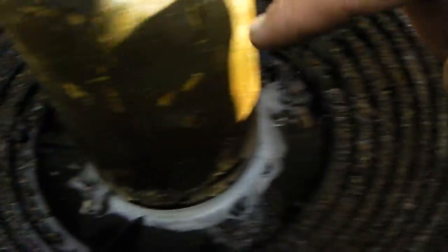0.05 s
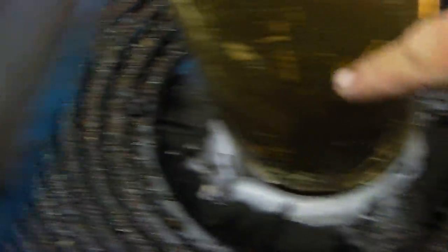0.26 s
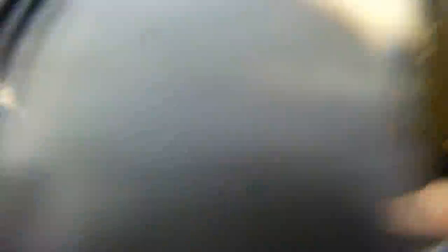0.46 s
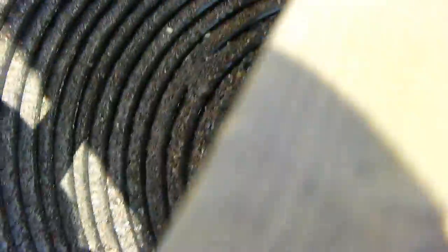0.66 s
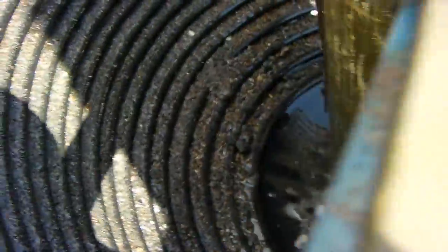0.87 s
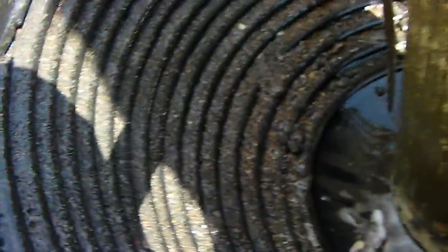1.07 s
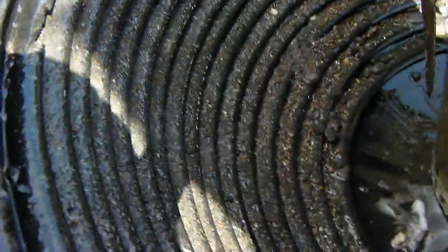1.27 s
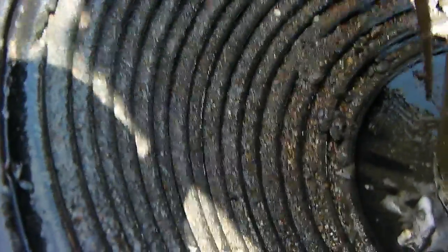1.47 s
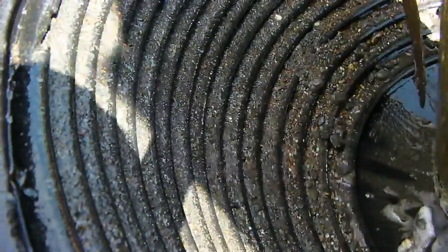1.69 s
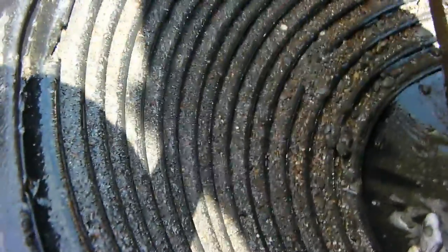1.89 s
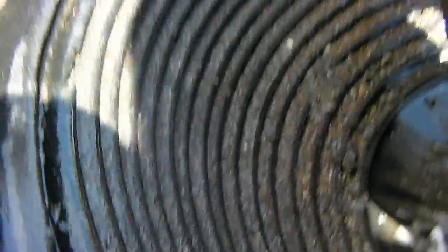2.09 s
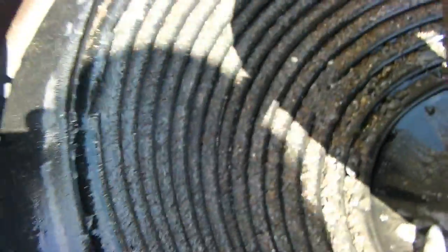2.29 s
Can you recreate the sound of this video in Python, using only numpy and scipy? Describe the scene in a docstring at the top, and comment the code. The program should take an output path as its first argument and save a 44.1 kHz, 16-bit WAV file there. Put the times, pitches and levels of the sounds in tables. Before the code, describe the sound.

A blade scrapes wet grit around a ribbed bowl in six short strokes, with clicks and hollow knocks. Before that come a rustle, a low rubbing groan, a squeak and one heavy bump right beside the microphone, outdoors.

```python
"""Outdoors, close to the microphone, a blade scrapes wet grit round a ribbed bowl in six strokes.
The grains click as the blade sticks and slips; they and the knocks ring the same hollow bowl.
Before the strokes, things are shifted about: a rustle, a low rubbing groan, a squeak, and right
beside the microphone one heavy bump that overloads it and bounces. Faint open air lies behind."""
import sys
import numpy as np
from scipy import signal
from scipy.fft import rfft, irfft
from scipy.io import wavfile
from scipy.ndimage import uniform_filter1d

SR = 44100
rng = np.random.default_rng(int(sys.argv[2]) if len(sys.argv) > 2 else 0)


def dump_mix(stems):
    """Bounce the given channels to the path in sys.argv[1] as a 16-bit WAV at rate SR."""
    frames = np.atleast_2d(stems).T  # one column per channel
    limited = np.clip(frames, -1, 1)  # hard clip at full scale
    pcm = np.round(limited * 32767).astype(np.int16)
    wavfile.write(sys.argv[1], SR, pcm)


N = 108045


def amp(db):
    """Decibels to gain."""
    return 10 ** (np.asarray(db) / 20)


def unit(x):
    """Scale to rms 1."""
    return x / np.sqrt(np.mean(x ** 2))


def decay(t, t60):
    """A fade that falls 60 dB in t60 seconds."""
    return np.exp(-np.log(1000) * t / t60)


def envelope(rows, column=1):
    """Gain along one dB column of a curve, fading out quickly beyond its ends."""
    rows, t = np.array(rows), np.arange(N) / SR
    inside = uniform_filter1d(1. * ((t >= rows[0, 0]) & (t <= rows[-1, 0])), size=300)
    return amp(np.interp(t, rows[:, 0], rows[:, column])) * inside


def colour(x, points):
    """Minimum-phase filter through (Hz, dB) points."""
    size = 4096
    hz, db = np.array(points).T
    curve = np.interp(np.log(np.fft.rfftfreq(size, 1 / SR) + 1), np.log(hz), db)
    cepstrum = irfft(np.log(amp(curve)))[:size // 2]
    cepstrum[1:] *= 2
    impulse = irfft(np.exp(rfft(cepstrum, size)))
    return signal.fftconvolve(x, impulse)[:len(x)]


def band(x, hz, kind, order=3):
    """Butterworth filter."""
    sos = signal.butter(order, np.minimum(hz, SR / 2 - 1), kind, fs=SR, output="sos")
    return signal.sosfilt(sos, x)


def wander(per_s):
    """A random curve of rms 1 that turns per_s times a second."""
    return unit(np.interp(np.arange(N) / SR * per_s, np.arange(4096), rng.standard_normal(4096)))


def struck(blows, modes, column, rise_cycles):
    """Modes that swell and die away after each blow, its strength read from one dB column."""
    force, t = np.zeros(N), np.arange(SR // 3) / SR
    for blow in blows:
        force[int(blow[0] * SR)] += amp(blow[column])
    ring = 0
    for hz, db, t60 in modes:
        rise = 1 - np.exp(-t * hz / rise_cycles)
        ring += amp(db) * np.sin(2 * np.pi * hz * t) * decay(t, t60) * rise
    return signal.fftconvolve(force, ring)[:N]


def pan(x, db):
    """Place a sound by its left-minus-right level."""
    return x * amp(np.array([[db], [-db]]) / 2)


# Stereo width at the microphone. Each row: frequency in Hz, side gain in dB.
STEREO_WIDTH = [(50, -5), (130, -14.5), (400, -13), (1500, -17), (2800, -18), (5000, -7.5), (9000, -5.5),
                (15000, -5)]

def stereo(mid, side):
    """Left and right, narrowest in the midrange."""
    return mid + colour(side, STEREO_WIDTH) * np.array([[1], [-1]])


def spread(source):
    """Draw a random source twice, as mid and as side."""
    return stereo(source(), source())


# The air behind the bowl. Each row: frequency in Hz, gain in dB.
AIR_COLOUR = [(35, -31), (60, -40), (117, -3), (224, -13), (418, 7.5), (605, -8), (1330, -5), (1520, -7),
              (9230, -13.5), (15000, -83)]

def open_air():
    """Faint, steady outdoor noise."""
    return amp(-44) * spread(lambda: unit(colour(rng.standard_normal(N), AIR_COLOUR)))


# Handling, close by. Each row: time in seconds, level in dB.
RUMBLE_LEVEL = [(0, -42.5), (.3, -39), (.5, -44), (.65, -54), (.85, -46.5), (.95, -42.5), (1.15, -44),
                (1.4, -48), (1.7, -54.5), (2.2, -45.5), (2.45, -53.5)]
# Its tone. Each row: frequency in Hz, gain in dB.
RUMBLE_COLOUR = [(20, -30), (45, -14), (80, -2), (150, -1.5), (240, -14), (500, -7), (2000, -64)]

def handling_rumble():
    """Low noise that swells and sinks as things are handled."""
    noise = spread(lambda: unit(colour(rng.standard_normal(N), RUMBLE_COLOUR)))
    return noise * envelope(RUMBLE_LEVEL)


def grit(per_s, chatter_db, spread_db=2):
    """Dense grain clicks of uneven size that bunch as the contact sticks and slips."""
    clicks = (rng.random(N) < per_s / SR) * rng.choice([-1, 1], N)
    size_db = spread_db * np.minimum(rng.exponential(size=N), 5)
    return unit(clicks * amp(size_db + chatter_db * wander(per_s=130)))


def wet_ticks(per_s=260, low_hz=2640, high_hz=12130, spread_db=8.5):
    """Small pitched ticks of wet grit, a few much louder than the rest."""
    out, t = np.zeros(N + SR), np.arange(SR // 20) / SR
    fade, candidates = decay(t, t60=0.035), 1000
    for when, pitch, size, chance in rng.random((candidates, 4)):
        if chance * candidates < per_s * N / SR:
            hz, start = low_hz + pitch * (high_hz - low_hz), int(when * N)
            gain = amp(-spread_db * np.log(max(size, 0.1)))
            out[start:start + len(t)] += gain * fade * np.sin(2 * np.pi * hz * t)
    return unit(out[:N])


# Grit shifting near the microphone. Each row: time in seconds, level in dB.
RUSTLE_LEVEL = [(0, -34.5), (.04, -31), (.1, -32.5), (.2, -31), (.32, -30.5), (.42, -29.5), (.55, -34.5),
                (.7, -35.5), (.82, -37.5), (1.2, -39.5), (1.8, -43), (2.45, -47)]
# Its tone. Each row: frequency in Hz, gain in dB.
RUSTLE_COLOUR = [(180, -101), (300, -21.5), (404, 2), (543, -21), (744, -8.5), (1240, -11.5), (1560, -10.5),
                 (2210, -9.5), (2980, -8), (3450, -11), (7620, -8.5), (15500, -14)]

def rustle():
    """Handled grit: a wash of grain clicks dotted with wet ticks."""
    def grains_and_ticks():
        grains = unit(colour(grit(per_s=9000, chatter_db=2.15), RUSTLE_COLOUR))
        ticks = unit(colour(wet_ticks(), RUSTLE_COLOUR))
        return grains + amp(-11.5) * ticks
    return spread(grains_and_ticks) * envelope(RUSTLE_LEVEL)


# Knocks on the bowl, close up. Each row: start in seconds, then body, rasp, treble and rim levels in dB.
KNOCKS = [(0.0716, -73, -32, -37, -63), (0.1926, -30, -24, -20.5, -60), (0.203, -30, -21, -41, -40),
          (0.2629, -36, -34, -19.5, -60), (0.2908, -35, -28, -49, -52), (0.4312, -11, -15.5, -19.5, -19),
          (0.493, -23, -34, -26, -48), (0.831, -36, -18.5, -42, -50), (0.9342, -16.5, -23, -10.5, -30),
          (0.944, -6, -31, -43, -43), (1.0587, -50, -39, -16.5, -47), (1.102, -35, -22, -34, -15.5),
          (1.12, -9, -43, -32, -40), (1.2335, -14, -16, -15, -17.5), (1.330, -15.5, -32.5, -26.5, -22),
          (1.336, -21, -36, -34, -34), (1.441, -43, -35, -17.5, -50), (1.7993, -38, -41, -28.5, -62),
          (1.815, -40, -40, -30, -60), (2.0549, -46, -34, -17, -55), (2.1704, -24, -19.5, -19.5, -51),
          (2.187, -46, -17.5, -18.5, -50), (2.305, -46, -37, -32.5, -70), (2.402, -56, -49.5, -37, -75)]

def knock_force(column, crunch, pulse=0.32, crunch_s=0.0014):
    """Force of the knocks in one register: a sharp pulse and a short crunch of crushed grit."""
    force, t = np.zeros(N + SR), np.arange(SR // 20) / SR
    fade = t * np.exp(-t / crunch_s)
    scale = np.sqrt(0.0086 * SR)  # a knock's level counts over 8.6 ms
    for knock in KNOCKS:
        crushed = rng.standard_normal(len(t)) * fade / np.linalg.norm(fade)
        blow = pulse * (t == 0) + crunch * crushed
        start = int(knock[0] * SR)
        force[start:start + len(t)] += blow * amp(knock[column]) * scale
    return force[:N]


# Notes of the rim. Each row: frequency in Hz, gain in dB, t60 in seconds.
RIM_MODES = [(875, 3.5, 0.12), (1036, -3, 0.16), (843, -2, 0.086)]
# Notes of the air in the bowl. Each row: frequency in Hz, gain in dB, t60 in seconds.
CAVITY_MODES = [(130, -14, 0.18), (195, -11, 0.075), (420.4, -6.5, 0.11), (449.2, 0.5, 0.16)]

def knock_notes():
    """Each knock sets the rim and the air in the bowl ringing."""
    rim = struck(KNOCKS, RIM_MODES, column=4, rise_cycles=5.7)
    cavity = struck(KNOCKS, CAVITY_MODES, column=1, rise_cycles=5.7)
    return rim + cavity


# A falling groan, dead centre. Each row: time in seconds, pitch in Hz, level in dB.
GROAN = [(.09, 182.4, -61), (.135, 170, -31.5), (.165, 156.4, -28), (.22, 144.4, -36.5), (.29, 127, -42),
         (.34, 115.7, -58)]
# A brief squeak over it. Each row: time in seconds, pitch in Hz, level in dB.
SQUEAK = [(.195, 1030, -36), (.202, 1056, -20.5), (.209, 1060, -19), (.214, 1076, -28), (.23, 1060, -29)]

def rubbing(curve, roughness):
    """A gliding stick-slip tone with an unsteady pitch."""
    times, hz, _ = np.array(curve).T
    pitch = np.interp(np.arange(N) / SR, times, hz) * (1 + roughness * wander(per_s=204))
    return np.sqrt(2) * np.sin(2 * np.pi * np.cumsum(pitch) / SR) * envelope(curve, column=2)


# The blade close up, one curve a resonance; the curve at 0.196 s rings with the squeak, and the two curves at
# 2.171 s are the ringing clack of the knock there. Each row: time in seconds, frequency in Hz, level in dB.
BLADE_RESONANCES = [
    [(.196, 2150, -37), (.208, 2190, -26.5), (.255, 2090, -45)],
    [(1.88, 5300, -41), (1.95, 5500, -26), (2.03, 5500, -37)],
    [(2.052, 2587, -19.5), (2.075, 2560, -28), (2.095, 2616, -35)],
    [(2.055, 3250, -21.5), (2.1, 3386, -34), (2.125, 3625, -27), (2.15, 3900, -36)],
    [(2.07, 4240, -39), (2.11, 4150, -30), (2.19, 4200, -48)],
    [(2.07, 10000, -29), (2.125, 11900, -26), (2.16, 13000, -40)],
    [(2.171, 1280, -16), (2.19, 1300, -33), (2.26, 1320, -40)],
    [(2.171, 1800, -16), (2.19, 1780, -28), (2.25, 1750, -42)],
]

def singing_blade(relative_width=0.081):
    """The scraping blade, the squeak and the clack of one knock resonate in narrow, gliding bands of friction
    noise."""
    out = 0
    for curve in BLADE_RESONANCES:
        times, hz, _ = np.array(curve).T
        phase = 2 * np.pi * np.cumsum(np.interp(np.arange(N) / SR, times, hz)) / SR
        width_hz = relative_width * hz.mean()
        noise = np.sin(phase) * wander(width_hz) + np.cos(phase) * wander(width_hz)
        out += noise * envelope(curve, column=2)
    return out


# A bump beside the microphone, main blow first, then a light touch just before it and the bounces after. Each
# row: start in seconds, level in dB.
BUMPS = [(0.4316, -4), (0.415, -39.5), (0.473, -23), (0.4785, -27.5), (0.4909, -24), (0.504, -24.5),
         (0.532, -36), (0.632, -36.5)]
# Notes of the bumped thing. Each row: frequency in Hz, gain in dB, t60 in seconds.
BUMP_MODES = [(56.7, -4.5, .12), (78.6, -4.5, 0.11), (171, -9.5, 0.09), (406.4, -2.5, 0.14),
              (433.5, 13.5, 0.06), (654, -37, 0.034), (798, 13, 0.021), (922, -1, 0.036),
              (1216, -1.5, 0.045)]

def heavy_bump(split_hz=200, crack_s=0.0011):
    """One crack and dull bounces; the deep thud leans left, the higher ring right."""
    since = np.arange(N) / SR - BUMPS[0][0]
    burst = (since >= 0) * np.exp(-np.abs(since) / crack_s)
    crack = spread(lambda: burst * unit(band(rng.standard_normal(N), [900, 7500], "bandpass", order=1)))
    thud = struck(BUMPS, [m for m in BUMP_MODES if m[0] < split_hz], column=1, rise_cycles=0.091)
    ring = struck(BUMPS, [m for m in BUMP_MODES if m[0] >= split_hz], column=1, rise_cycles=0.95)
    return pan(band(thud, 30, "highpass"), db=2.5) + pan(ring, db=-8) + amp(-0.5) * crack


# Six close strokes, one curve each. Each row: time in seconds, then body, rasp and treble levels in dB.
STROKES = [
    [(0.8, -49, -29.5, -37), (0.818, -35, -37, -38), (0.836, -25.5, -15.5, -20), (0.874, -29.5, -16, -17.5),
     (0.912, -29, -27, -25), (0.94, -31, -16, -12), (0.96, -35, -24.5, -48), (0.985, -31, -40, -50)],
    [(1.0, -35, -45, -51), (1.02, -36, -32, -29), (1.046, -39, -27, -28), (1.062, -34, -16.5, -19),
     (1.084, -38, -23.5, -16.5), (1.104, -18.5, -17, -20), (1.142, -26.5, -23, -33), (1.2, -34, -49, -65)],
    [(1.355, -29, -28, -30), (1.369, -26.5, -19, -18.5), (1.393, -28.5, -26, -31), (1.431, -25, -26, -21),
     (1.445, -36, -22, -20.5), (1.485, -30, -57, -57), (1.513, -44, -41, -48), (1.52, -35, -45, -45)],
    [(1.52, -42, -38, -47), (1.534, -39, -38, -40), (1.554, -49, -30.5, -30.5), (1.582, -36.5, -20, -24.5),
     (1.634, -39, -21, -21.5), (1.68, -40, -25.5, -26.5), (1.708, -33, -26.5, -33), (1.735, -37, -52, -56)],
    [(1.83, -51, -43, -50), (1.864, -38.5, -37, -37), (1.888, -31, -35.5, -25.5), (1.912, -37, -32, -29.5),
     (1.946, -38, -22.5, -18.5), (1.996, -35, -30, -31), (2.022, -55, -36, -35), (2.04, -27, -36, -36)],
    [(2.04, -43, -35, -40), (2.058, -27, -21, -16), (2.104, -30.5, -33, -22.5), (2.126, -30, -30, -23.5),
     (2.162, -30, -26, -24.5), (2.174, -37, -19, -47), (2.186, -23.5, -36, -38), (2.22, -42, -38, -65)],
]

def scrape_force(grains, column):
    """Force of the blade dragging grit over the ribs, in one register."""
    return grains * sum(envelope(stroke, column) for stroke in STROKES)


# Echoes inside the bowl. Each row: octave centre in Hz, gain in dB, t60 in seconds.
WALL_ECHOES = [(600, -4, 0.36), (1296, 5, 0.2), (2320, -1, 0.19), (4200, 3.5, 0.097), (8260, -7, 0.11),
               (15100, 5.5, 0.036)]

def reflections(t):
    """Dense echoes between the walls of the bowl, shorter in the treble."""
    out = 0
    for hz, db, t60 in WALL_ECHOES:
        fade = decay(t, t60)
        echoes = rng.standard_normal(len(t)) * fade / np.linalg.norm(fade)
        out += amp(db) * band(echoes, [hz / np.sqrt(2), hz * np.sqrt(2)], "bandpass", order=2)
    return out


# Notes of the bowl. Each row: frequency in Hz, gain over the plain contact in dB, t60 in seconds.
BOWL_MODES = [(134, 11, 0.35), (406, 25, 0.2), (433.6, 22.5, 0.13), (550, 14.5, 0.19), (659.5, 16.5, 0.23),
              (855, 11, 0.24), (853, -47, 0.72), (1118, -1, 0.055), (1276, 17.5, 0.13), (1527, 15, 0.49),
              (1732, 7, 0.11), (1805, -6.5, 0.1), (1962, 11, 0.34), (2316, 9.5, 0.41)]
# Tone of the contact. Each row: frequency in Hz, gain in dB.
CONTACT_COLOUR = [(40, -54), (130, 1), (240, -11), (400, -1.5), (700, 3.5), (1200, -2.5), (1800, 3.5),
                  (2600, 1.5), (3300, -3.5), (5200, 2), (8000, 4.5), (10000, -2), (13000, -6.5),
                  (16000, -9)]

def bowl_response(body_hz=932, treble_hz=2930):
    """The bowl's answer to one click, split into body, rasp and treble of equal energy."""
    t = np.arange(SR // 4) / SR
    ring = 1. * (t == 0)
    for hz, db, t60 in BOWL_MODES:
        gain = amp(db) * 2 * np.log(1000) / (t60 * SR)
        ring += gain * decay(t, t60) * np.cos(2 * np.pi * hz * t)
    mid = colour(ring + reflections(t), CONTACT_COLOUR)
    side = colour(np.sqrt(2) * reflections(t) - 0.44 * band(ring, body_hz, "lowpass"), CONTACT_COLOUR)
    both = stereo(mid, side)
    body = band(both, body_hz, "lowpass", order=4)
    rasp = band(both, [body_hz, treble_hz], "bandpass")
    treble = band(both, treble_hz, "highpass", order=4)
    return [part / np.linalg.norm(part.mean(axis=0)) for part in (body, rasp, treble)]


def stirred_bowl(places=17, body_lag_s=0.00328):
    """Strokes and knocks ring the bowl; its echoes change as the blade moves from place to place."""
    grains = grit(per_s=7000, chatter_db=2.33)
    # the hollow note builds just after the click
    thuds = np.roll(knock_force(column=1, crunch=0.98), int(body_lag_s * SR))
    body = scrape_force(grains, column=1) + amp(-5.5) * thuds
    rasp, treble = (scrape_force(grains, column) + knock_force(column, crunch=0.81) for column in (2, 3))
    out = np.zeros((2, N + SR))
    for span in np.array_split(np.arange(N), places):
        for force, response in zip((body, rasp, treble), bowl_response()):
            sound = signal.fftconvolve(force[span][None], response, axes=1)
            out[:, span[0]:span[0] + sound.shape[1]] += sound
    return out[:, :N]


def scene():
    """The bowl up close, the handling sounds around it and the open air behind."""
    tones = rubbing(GROAN, roughness=0.072) + rubbing(SQUEAK, roughness=0.043) + spread(singing_blade)
    bowl = stirred_bowl() + knock_notes()
    surroundings = rustle() + handling_rumble() + open_air()
    return bowl + surroundings + tones + heavy_bump()


def record(dry, top_hz=15850):
    """The recorder clips at full scale and cuts the top."""
    lowpass = signal.ellip(10, .2, 70, top_hz, fs=SR, output="sos")
    return signal.sosfilt(lowpass, np.clip(dry, -1, 1))


dry = scene()
out = record(dry)
dump_mix(out)
```